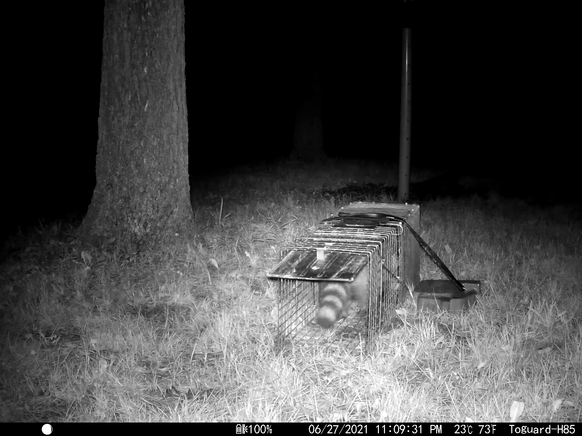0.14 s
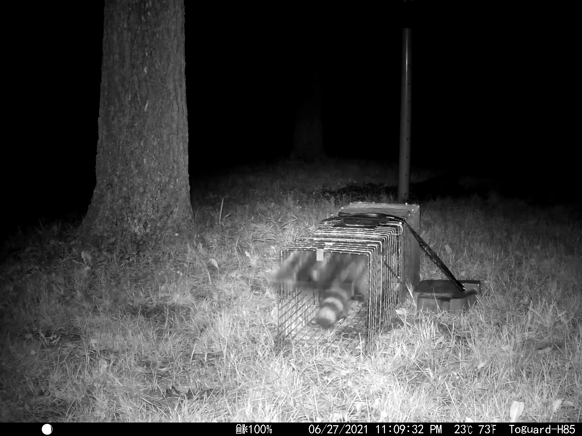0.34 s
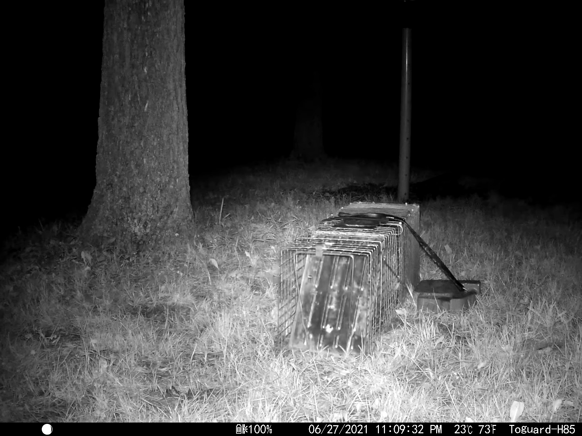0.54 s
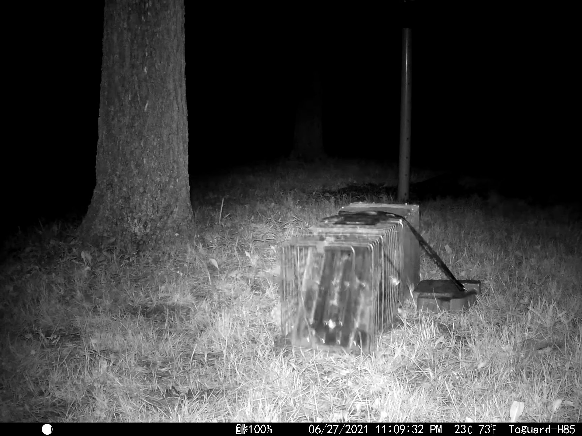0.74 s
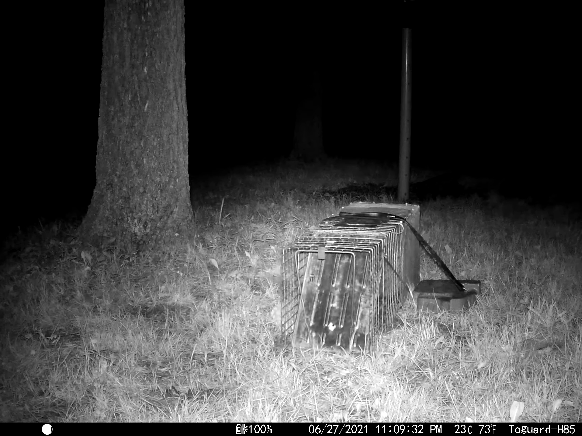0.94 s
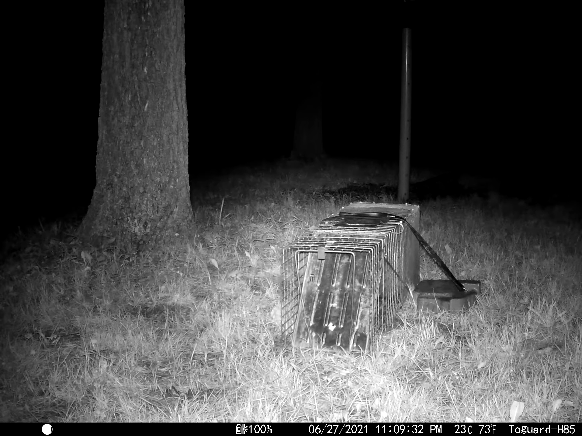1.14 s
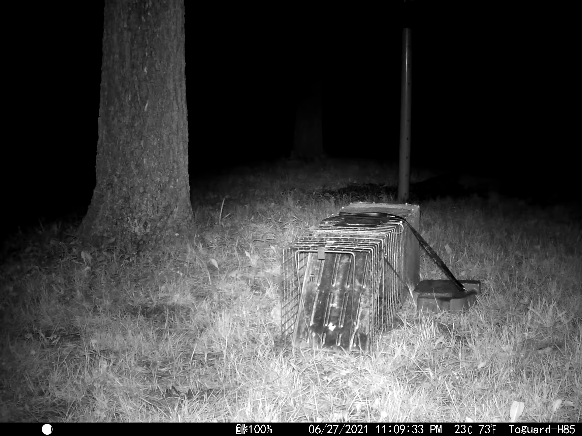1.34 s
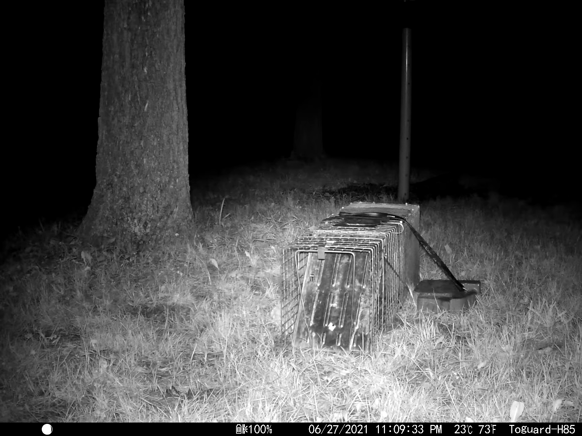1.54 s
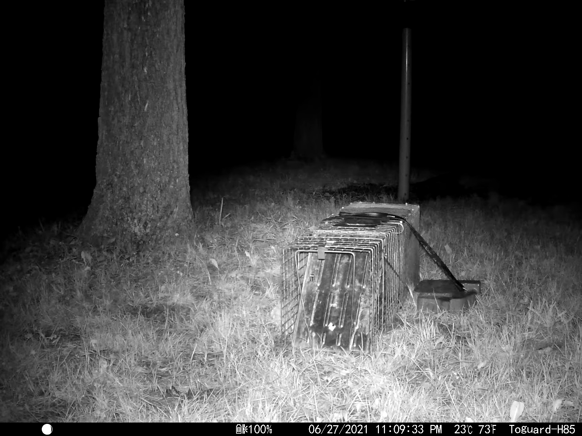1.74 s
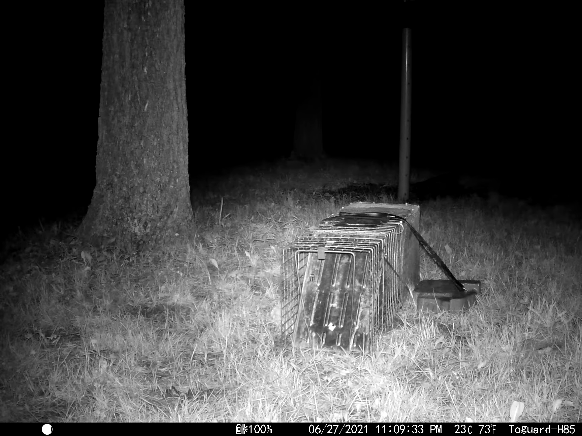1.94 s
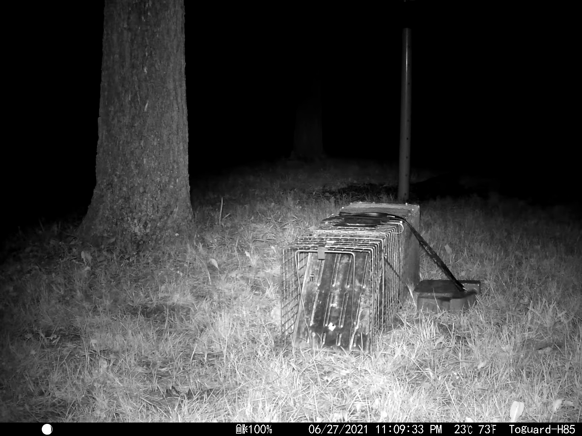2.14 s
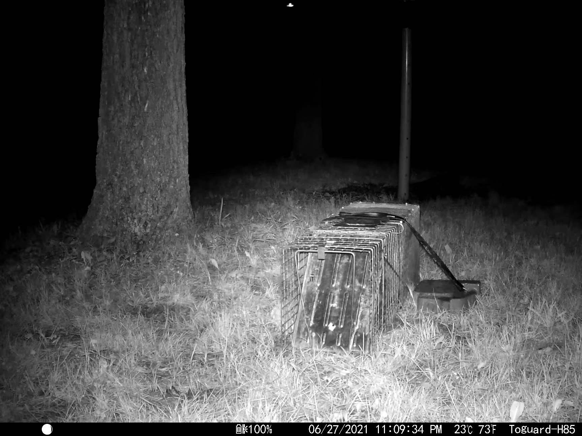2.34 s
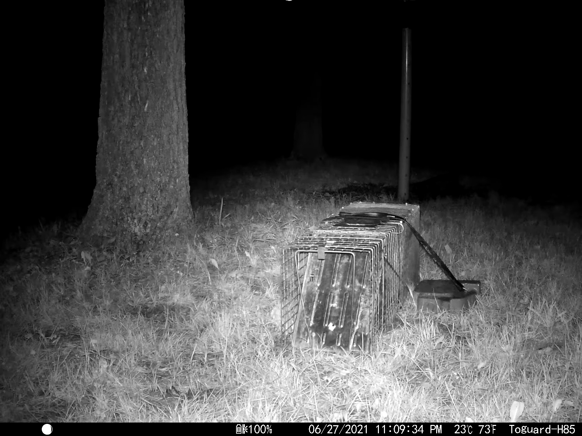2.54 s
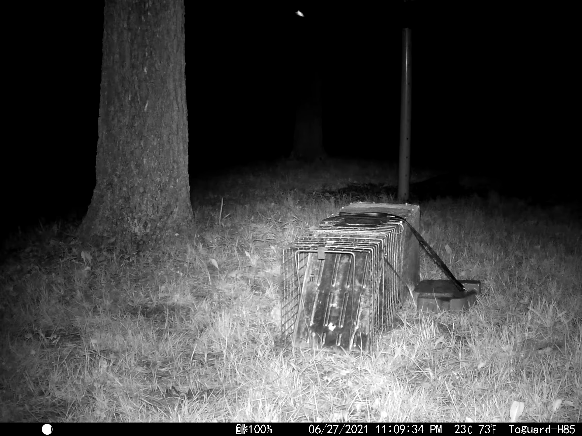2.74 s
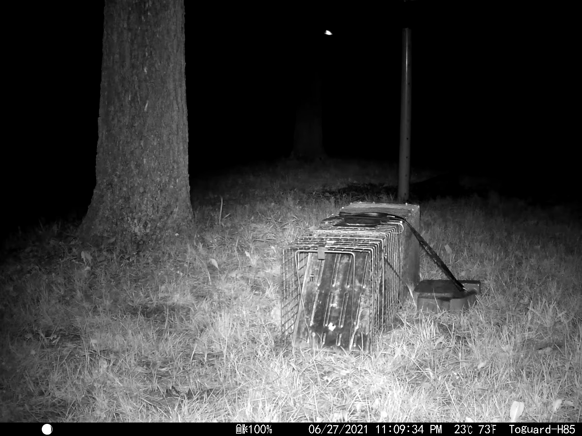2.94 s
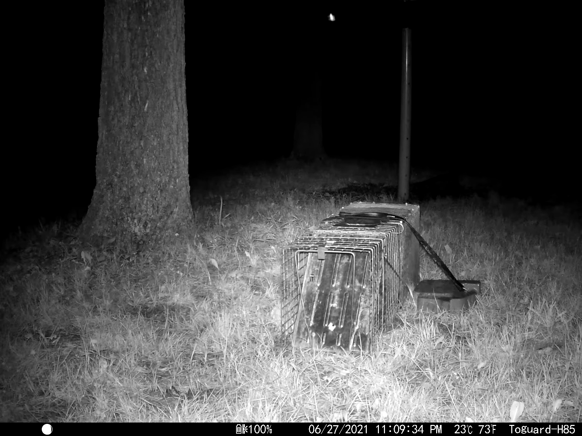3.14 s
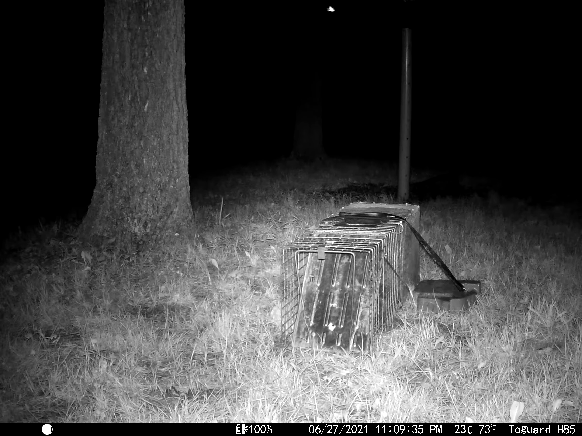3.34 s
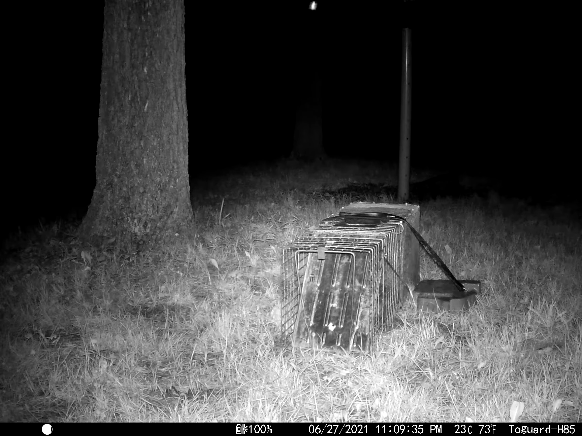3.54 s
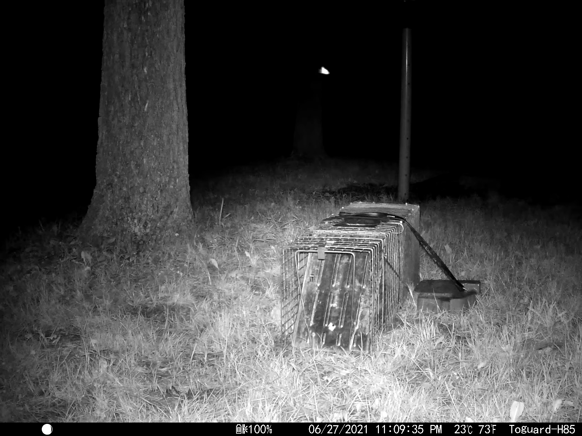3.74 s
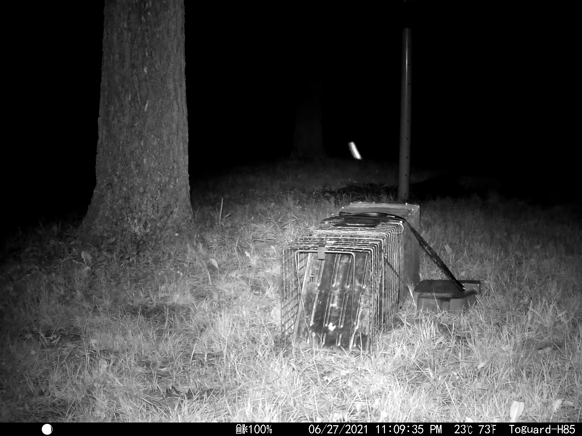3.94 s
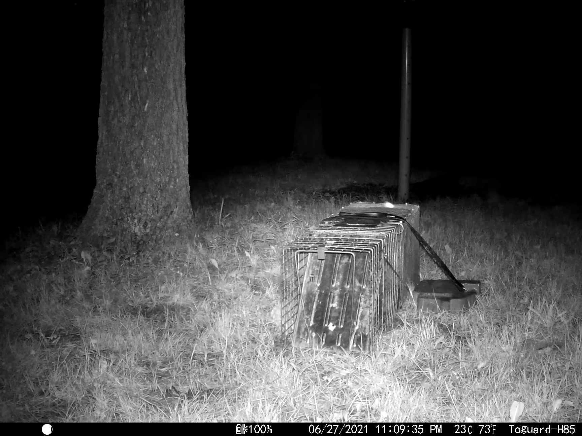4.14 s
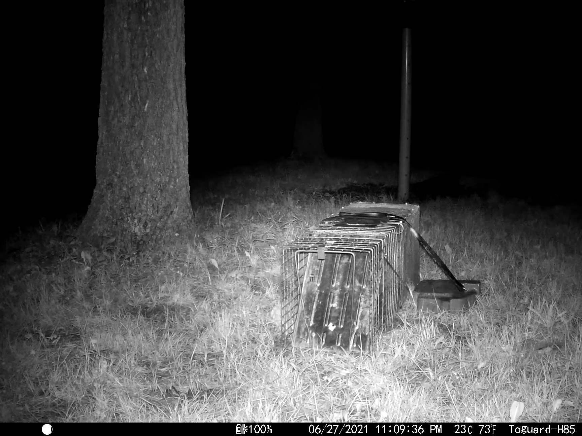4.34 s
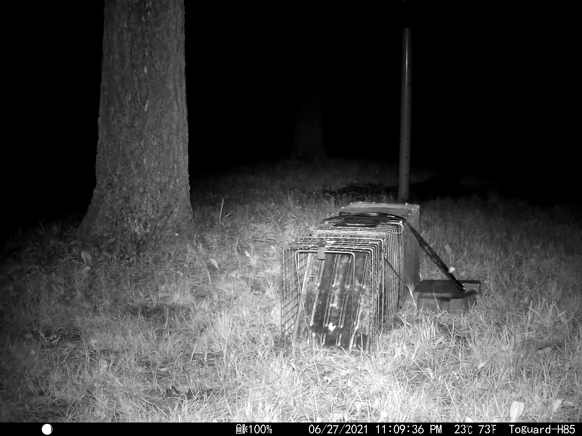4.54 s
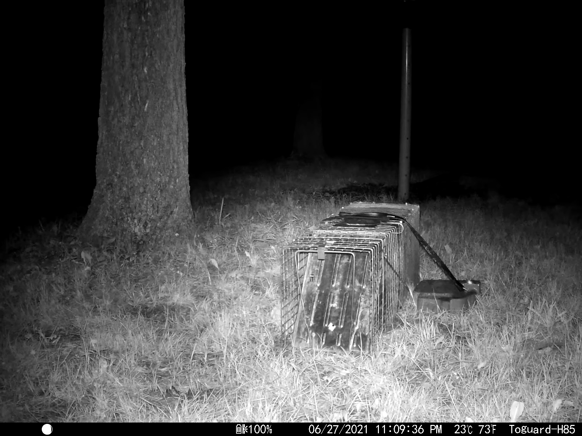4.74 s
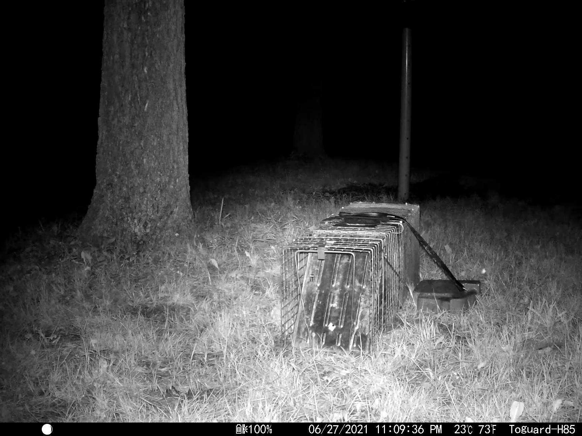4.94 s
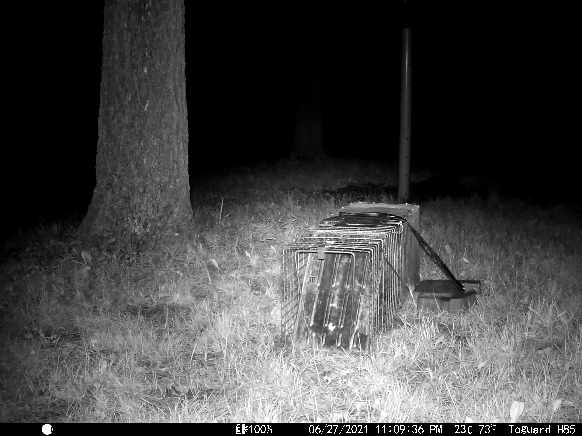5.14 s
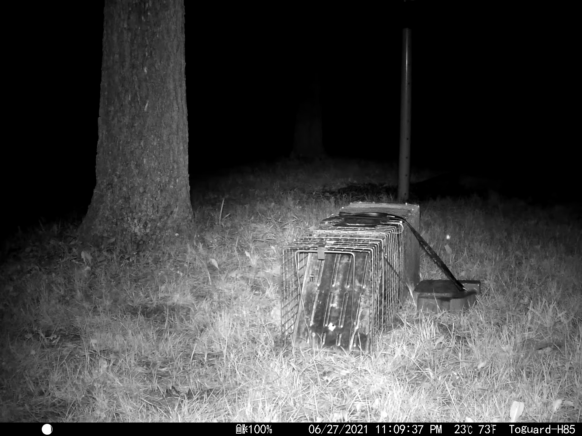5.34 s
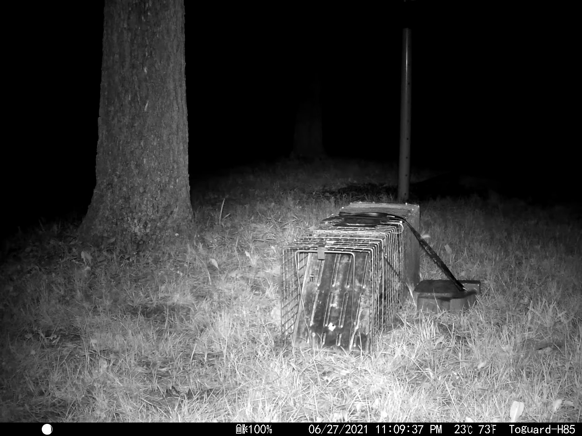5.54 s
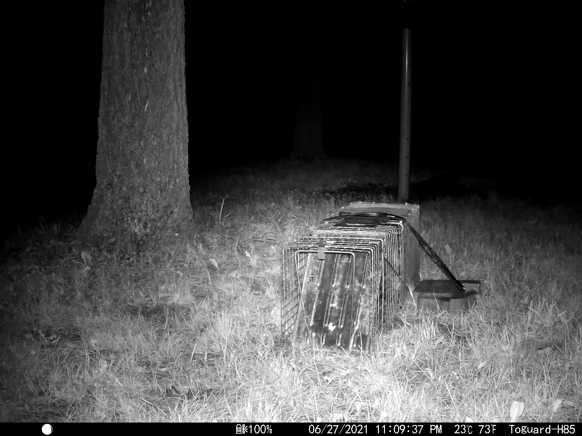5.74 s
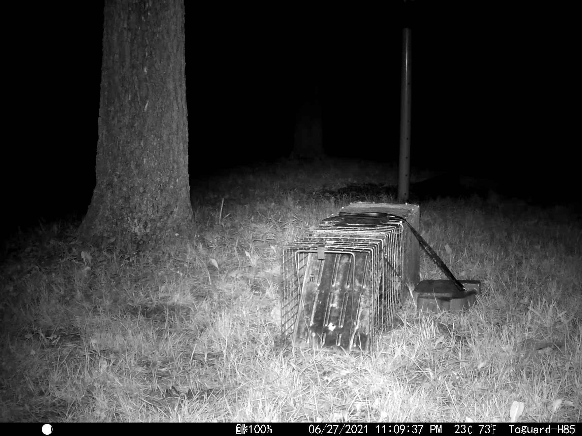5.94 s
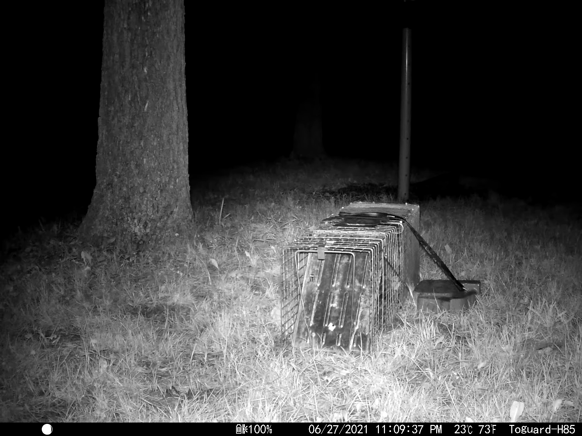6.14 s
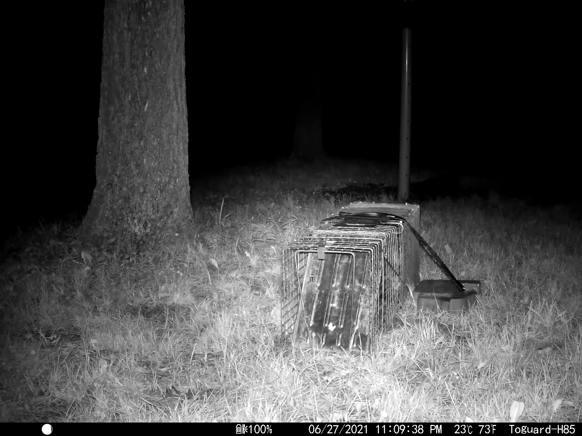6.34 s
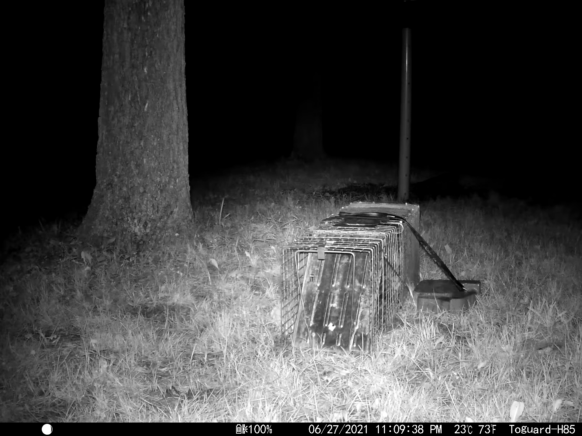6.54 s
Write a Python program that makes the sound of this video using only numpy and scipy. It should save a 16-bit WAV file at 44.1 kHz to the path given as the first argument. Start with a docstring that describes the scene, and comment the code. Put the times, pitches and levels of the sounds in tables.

```python
"""Cage trap springing at night

On a lawn, a few metres from the microphone, a wire cage trap's trigger scrapes free; its sheet-metal
door slams and the lock rattles down. Struck wires and panel are decaying sines, cracks and thuds noise.
Crickets trill and chirp throughout as trains of drooping wing-stroke tones.
Shaped noise makes the night rumble, a thin hiss and light puffs of air bumping the microphone."""
import sys
import numpy as np
from scipy import signal
from scipy.fft import irfft
from scipy.io import wavfile
from scipy.ndimage import map_coordinates

SR = 44100
rng = np.random.default_rng(int(sys.argv[2]) if len(sys.argv) > 2 else 0)


def bounce(signal):
    """Save signal as a 16-bit WAV file at the path given by the first command-line argument."""
    frames = np.transpose(np.atleast_2d(signal))
    limited = np.clip(frames, -1, 1)
    pcm = np.round(limited * 32767).astype(np.int16)
    wavfile.write(sys.argv[1], SR, pcm)


N = 291412
T = np.arange(N) / SR

# Metal contacts: trigger scrape, door slam and bounces, lock rattle and drop, cage settling.
# Columns: start_s, relative mesh level_db, relative door level_db, chatter_s, struck wire pitch_hz
CONTACTS = [ (0.374, -39, -65.5, .007, 4900), (0.408, -30, -59, .003, 6600),
            (0.463, -30.5, -53.5, .018, 5670), (0.489, -34.5, -62, .022, 5640),
            (.544, -12, -44.5, .009, 7240), (.556, -12, -25.5, .01, 5450), (.564, -13, -26.5, .01, 4950),
            (.574, -10, -20, 0.003, 5950), (.593, -11.5, -26.5, .008, 6060),
            (0.619, -16, -31.5, 0.0073, 5960), (0.647, -14, -35.5, 0.004, 5740),
            (.685, -19, -33, 0.067, 7340), (.74, -17.5, -40, .023, 5770), (0.765, -13.5, -35, 0.0015, 7000),
            (0.802, -17, -48, .007, 7200), (.815, -17.5, -50, 0.0083, 7360), (.848, -23, -31.5, 0.02, 2475),
            (.854, -18, -55, 0.0093, 6050), (.889, -33, -44.5, 0.029, 5570),
            (0.933, -28.5, -40, 0.013, 5840), (1.022, -42, -53.5, 0.0031, 5700),
            (1.102, -45.5, -58, .011, 6040)]
# Ringing wires of the cage. Columns: pitch_hz, relative level_db, t60_s
WIRE_MODES = [(1180, -17, .25), (1270, -14, .25), (1555, -17, .25), (1690, -17, .25), (2470, -14, .25),
              (3471, -7.5, .25), (3660, -10, .2), (4180, -13, .22), (4683, -10, .18), (4934, -5, .22),
              (5233, -8, .24), (5755, -1, .22), (5820, -4, .2), (5925, -3, .2), (6128, 0, .28),
              (6210, -5, .2), (6667, -3, .26), (6822, -6, .22), (7040, -6, .22), (7150, -4, .2),
              (7230, -4, .2), (7415, -7, .26), (8472, -6, .22), (8992, -9, .22)]
# Door panel and cage frame. Columns: pitch_hz, relative level_db, t60_s
PANEL_MODES = [(150, -13, .25), (194, -4, .33), (203, -1, .2), (256, -2.5, .23), (307, 3.5, .72),
               (335, -2, .18), (378, -2, .3), (480, -4.5, .22), (543, -2, .13), (679, -15, .25),
               (786, -12, .25), (838, -13, .33)]
# Spectrum of the crowd of weak mesh modes. Columns: frequency_hz, relative level_db
MESH_SPECTRUM = [(40, -17.5), (200, -15.5), (450, -12.5), (680, -18.5), (950, -13.5), (1250, -7),
                 (2100, -12), (3000, -7.5), (4800, -3), (6000, -1.5), (7200, -2.5), (9000, -8.5),
                 (11500, -19), (15500, -33.5)]
# Level of the nearer trilling cricket over time. Columns: start_s, relative level_db
NEAR_TRILL_LEVEL = [(0, -63), (1.3, -60), (2.7, -62.5), (3.3, -59.5), (4.2, -62.5), (5.45, -57), (6.1, -64),
                    (6.5, -56.5)]
# Spectrum of the low night rumble. Columns: frequency_hz, relative level_db
RUMBLE_SPECTRUM = [(15, -11), (25, 1), (130, -5), (285, -12), (450, -15.5), (600, -18.5), (1500, -24.5),
                   (3600, -31), (8000, -57.5)]
# One small rustle in the cage. Columns: start_s, level_db, fade_s
GRASS_SCUFF = (3.725, -60, 0.052)
# Chirping bouts at an even pace; each chirp's three strokes start 0.030 s before,
# 0.008 s before and 0.014 s after its time.
# Columns: start_s, end_s, chirp_period_s, relative level_db
CHIRP_BOUTS = [(.095, .36, .184, -66.5), (1.215, 2.56, .208, -62), (2.74, 3.33, .172, -63.5),
               (3.452, 3.95, .206, -61.5), (4.28, 5.48, .221, -61.5)]
# Gusts on the microphone. Columns: start_s, hold_s, relative level_db
WIND_GUSTS = [(1.578, 0.056, -51), (1.668, 0.083, -53), (1.781, 0.03, -49.5), (1.961, 0.028, -53),
              (2.996, 0.062, -55), (3.125, 0.047, -45.5), (3.378, 0.12, -53), (4.318, 0.053, -56),
              (4.732, 0.031, -55.5), (4.876, 0.061, -47), (5.101, 0.092, -49.5), (5.226, 0.11, -48.5),
              (5.37, 0.087, -47), (5.535, 0.043, -49.5), (5.736, 0.041, -45.5), (6.235, 0.19, -48.5),
              (6.454, 0.083, -42.5)]

# Noise colours. Columns: frequency_hz, relative level_db
FOLIAGE_SPECTRUM = [(100, 2.0), (1500, 3.0), (7000, -10), (15000, -19.0)]
PUFF_SPECTRUM = [(10, -17), (30, 2.0), (55, 5), (100, -4), (170, -16.0), (300, -26.5),
                 (700, -36.5), (3000, -49), (15000, -86.0)]
EDDY_SPECTRUM = [(30, -18), (90, 1), (200, -8), (400, -25.5), (3000, -60)]
HISS_SPECTRUM = [(1000, -6.5), (3500, 1.0), (7000, 2.5), (11000, 0.5), (14000, 1), (15500, -3.5)]
SCUFF_SPECTRUM = [(500, -14.5), (3000, -7.0), (7000, 6), (9000, 0), (15000, -19.5)]
THUD_SPECTRUM = [(20, -10), (60, -4.5), (120, -10), (200, -2), (400, -3.5), (700, -20.5), (3000, -50.0)]
# Level of the farther trilling cricket. Columns: start_s, level_db
FAR_TRILL_LEVEL = [(0, -66), (4, -64), (6.6, -61)]

RUMBLE_DB, HISS_DB = -63, -67
GUST_DB, GUST_EDGE_S = -2, 0.015  # gain on all gusts; basis of their rise and fall
BUFFET_DB, BUFFETS_PER_S = 5, 25  # eddies inside a gust
STRONG_GUST_DB = -42  # near this level a gust also breaks into faster eddies
CHIRP_HZ, CHIRP_SCATTER_HZ = 4438, 70  # pitch at the start of a stroke
STROKE_GAP_S = 0.022
RING_SAMPLES = SR * 2 // 3  # longest ring of one blow
LATCH_S = 0.8  # blows before the lock drops find the door grinding on its frame
SHOCK_S = 0.0009  # time for a shock to run along the wires
# This contact length has the plain mesh colour; each doubling dulls it (dB per octave)
PLAIN_CONTACT_S, DULLING_DB = 0.0086, 0.85
TOP_HZ = 15500


def undb(db):
    """Decibels to gain."""
    return 10 ** (np.asarray(db) / 20)


def unit(x):
    """Scale to rms 1."""
    return x / np.sqrt(np.mean(x ** 2))


def add(out, start_s, x):
    """Mix x into out from a start time."""
    i = max(int(start_s * SR), 0)
    out[i:i + len(x)] += x[:max(len(out) - i, 0)]


def noise(spectrum, size):
    """Random-phase noise of rms 1, coloured by the spectrum."""
    hz, db = np.transpose(spectrum)
    f = np.fft.rfftfreq(size, 1 / SR) + 1
    magnitude = undb(np.interp(np.log(f), np.log(hz), db))
    phase = np.exp(2j * np.pi * rng.random(len(f)))
    return unit(irfft(magnitude * phase, size))


def walk(rate):
    """Slow random drift with a spread near 1, through rate knots per second."""
    knots = rng.standard_normal(int(T[-1] * rate) + 2)
    return np.interp(T * rate, np.arange(len(knots)), knots)


def garden(x, wet_db, t60):
    """Trunks and foliage scatter a thin, late echo."""
    t = T[:SR]
    fade = np.exp(-np.log(1000) * t / t60)
    build_up = 1 - np.exp(-t / 0.02)
    echo = noise(FOLIAGE_SPECTRUM, size=SR) * fade * build_up
    echo = echo / np.sqrt(np.sum(echo ** 2))
    return x + undb(wet_db) * signal.fftconvolve(x, echo)[:N]


def gusts():
    """Strength of the air at the microphone: gusts rise, hold and fall while eddies buffet."""
    held = np.zeros(N)
    for start, hold, db in WIND_GUSTS:
        corners = [start - GUST_EDGE_S, start + GUST_EDGE_S / 2, start + hold, start + hold + GUST_EDGE_S]
        held += undb(db) * np.interp(T, corners, [0, 1, 1, 0])
    return held * undb(GUST_DB + BUFFET_DB * walk(BUFFETS_PER_S))


def breeze():
    """Low night rumble, soft puffs on the microphone and a thin even hiss, all shaped noise."""
    gust = gusts()
    puffs = gust * noise(PUFF_SPECTRUM, size=N)
    breakup = np.tanh(gust / undb(STRONG_GUST_DB))
    eddies = 0.61 * gust * breakup * noise(EDDY_SPECTRUM, size=N)
    rumble = noise(RUMBLE_SPECTRUM, size=N) * undb(RUMBLE_DB + 1.2 * walk(5))
    hiss = undb(HISS_DB) * noise(HISS_SPECTRUM, size=N)
    return puffs + eddies + rumble + hiss


def stroke(hz, fall_hz, length):
    """One wing stroke: the scraper slows along the file, so the tone droops."""
    u = np.arange(int(length * SR)) / (length * SR)
    cycles = np.cumsum(hz - fall_hz * u ** 2) / SR
    return np.sqrt(2) * np.sin(np.pi * u) * np.sin(2 * np.pi * cycles)


def trill(hz, fall_hz, length, period, waver_db):
    """An unbroken train of wing strokes, slightly uneven in time, pitch and level."""
    out = np.zeros(N)
    for s in np.arange(0.016, T[-1], period):
        late, sharp, loud = rng.standard_normal(3)
        wing = stroke(hz + 18 * sharp, fall_hz, length)
        add(out, s + 0.00039 * late, undb(waver_db * loud) * wing)
    return out


def chirping_cricket():
    """Bouts of short chirps, each a soft opening wing stroke and then two full ones."""
    out = np.zeros(N)
    for start, end, period, db in CHIRP_BOUTS:
        for s in np.arange(start, end, period):
            for k, effort_db in enumerate([-11, -2, -1]):
                sharp, loud = rng.standard_normal(2)
                wing = stroke(CHIRP_HZ + CHIRP_SCATTER_HZ * sharp, fall_hz=392, length=0.014)
                add(out, s - 0.03 + k * STROKE_GAP_S, undb(db + effort_db + 1.4 * loud) * wing)
    return out


def crickets():
    """Two trill at nearly the same stroke rate; a third chirps lower down, with more echo."""
    near = trill(hz=5428, fall_hz=430, length=0.018, period=1 / 39.13, waver_db=0.5)
    near *= undb(np.interp(T, *np.transpose(NEAR_TRILL_LEVEL)) + 4.0)
    far = trill(hz=5650, fall_hz=220, length=0.01, period=1 / 40.3, waver_db=3)
    far *= undb(np.interp(T, *np.transpose(FAR_TRILL_LEVEL)))
    trills = garden(near + far, wet_db=-6.5, t60=0.25)
    return trills + garden(chirping_cricket(), wet_db=-1.5, t60=0.5)


def rustle():
    """A brief dry scuff of grass against the mesh: a fading burst of noise."""
    out, t = np.zeros(N), T[:RING_SAMPLES]
    start, db, fade = GRASS_SCUFF
    add(out, start, undb(db) * np.exp(-t / fade) * noise(SCUFF_SPECTRUM, size=RING_SAMPLES))
    return out


def ring(modes, boost_db, scatter_db):
    """Decaying modes, one row a blow: every point of contact weights them differently."""
    hz, db, t60 = np.transpose(modes)
    shape = (len(CONTACTS), len(hz))
    gain = undb(db + boost_db + scatter_db * rng.standard_normal(shape))
    gain = gain / np.sqrt(np.sum(gain ** 2, axis=1, keepdims=True) / 2)
    gain = gain * rng.choice([-1, 1], shape)
    t = T[:RING_SAMPLES].astype('f')  # single precision saves memory
    turn, decay = (2 * np.pi * hz).astype('f'), (np.log(1000) / t60).astype('f')
    tones = np.sin(np.outer(turn, t)) * np.exp(-np.minimum(np.outer(decay, t), 20))
    return gain.astype('f') @ tones


def door(panel_db=0, thud_db=-8, grind_s=0.09):
    """The sheet-metal door booms at each blow and the frame thuds on the turf."""
    out, t = np.zeros(N), T[:RING_SAMPLES]
    panels = ring(PANEL_MODES, np.zeros(len(PANEL_MODES)), scatter_db=-3.5)
    swing = 1 - np.exp(-t / 0.0041)  # the broad sheet takes a moment to move
    for (start, _, db, *_), panel in zip(CONTACTS, panels):
        held = np.exp(-t / grind_s) if start < LATCH_S else 1
        thud = noise(THUD_SPECTRUM, size=RING_SAMPLES) * np.exp(-t / 0.025)
        boom = undb(panel_db) * held * panel
        add(out, start, undb(db) * swing * (boom + undb(thud_db) * thud))
    return out


def weak_modes(t60, spread_db, count=1000):
    """Many short welded wire spans, each with its own pitch and strength."""
    hz = np.linspace(400, 15400, count) + rng.uniform(-7, 7, count)
    points, db = np.transpose(MESH_SPECTRUM)
    db = np.interp(np.log(hz), np.log(points), db) + spread_db * (rng.random(count) - 0.5)
    return np.transpose([hz, db, np.full(count, t60)])


def contact(modes, focus_db=8.0, focus_hz=300):
    """Mode boost in dB: short contacts are brighter, and modes near the struck pitch speak most."""
    hz = np.array(modes)[:, 0]
    _, _, _, length, struck_hz = np.transpose(CONTACTS)[:, :, None]
    bright_db = DULLING_DB * np.log2(PLAIN_CONTACT_S / length)
    focus = focus_db / (1 + ((hz - struck_hz) / focus_hz) ** 2)
    return bright_db * np.log2(np.clip(hz, 700, 9000)) + focus


def chatter(t, length, rate, scatter_db):
    """Wires buzz against each other: a fading burst of tiny uneven impacts."""
    hits = rng.random(len(t)) < rate / SR
    clicks = hits * undb(scatter_db * rng.standard_normal(len(t))) * np.exp(-t / length)
    clicks[0] = 2.7  # the first impact is always present
    return clicks / np.sqrt(np.sum(clicks ** 2))


def cage(mesh_t60=0.2, wire_db=-5.0, mesh_db=-1.5, crack_db=2, flex_s=0.000015):
    """Each blow cracks and chatters and sets wires and mesh ringing."""
    out, t = np.zeros(N), T[:RING_SAMPLES]
    mesh = weak_modes(mesh_t60, spread_db=6)
    wire_ring = ring(WIRE_MODES, contact(WIRE_MODES), scatter_db=3.5)
    mesh_ring = ring(mesh, contact(mesh), scatter_db=4.0)
    metal = undb(wire_db) * wire_ring + undb(mesh_db) * mesh_ring
    spread = 1 - np.exp(-t / SHOCK_S)
    for (start, db, _, length, _), ringing in zip(CONTACTS, metal):
        crack = undb(crack_db) * noise(MESH_SPECTRUM, size=RING_SAMPLES) * np.exp(-t / 0.0015)
        force = chatter(t, length, rate=900, scatter_db=2.5)
        blow = signal.fftconvolve(force, (ringing + crack) * spread)[:RING_SAMPLES]
        add(out, start, undb(db) * blow)
    # the cage flexes as it shakes, so the wire pitches waver
    return map_coordinates(out, [(T + flex_s * walk(45)) * SR], order=3)


def scene():
    """The night air, the insects and the trap with a faint garden echo."""
    trap = garden(cage() + door() + rustle(), wet_db=-25.5, t60=0.7)
    return (breeze() + crickets() + trap)[None]


def record(dry, ceiling=0.9):
    """The small recorder rounds the loudest peaks and cuts the top."""
    rounded = ceiling * np.tanh(dry / ceiling)
    top_cut = signal.ellip(10, 0.2, 70, TOP_HZ, fs=SR, output="sos")
    return signal.sosfilt(top_cut, rounded)


dry = scene()
out = record(dry)
bounce(out)
```